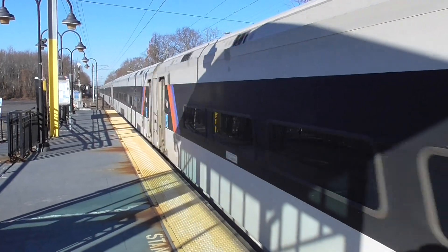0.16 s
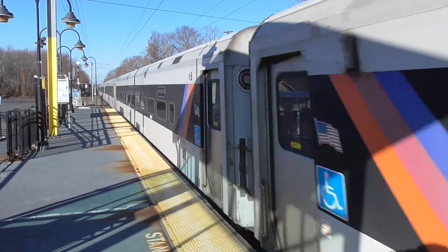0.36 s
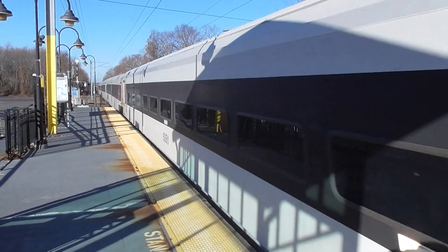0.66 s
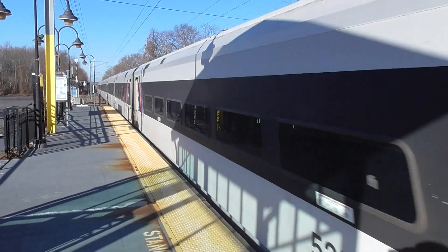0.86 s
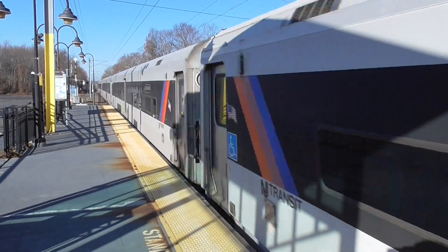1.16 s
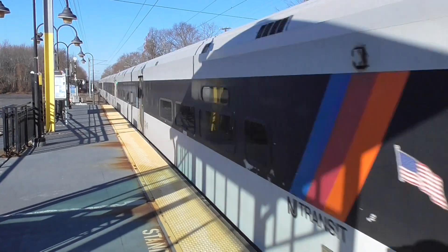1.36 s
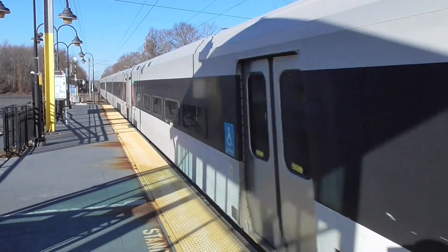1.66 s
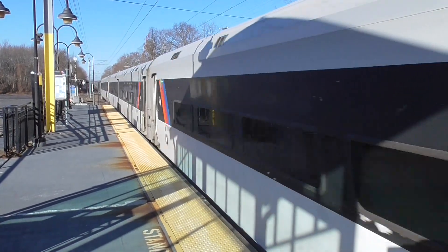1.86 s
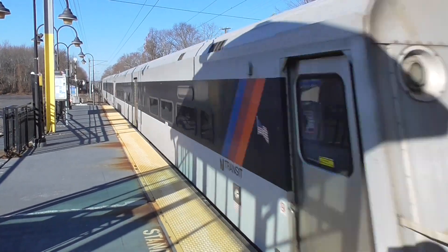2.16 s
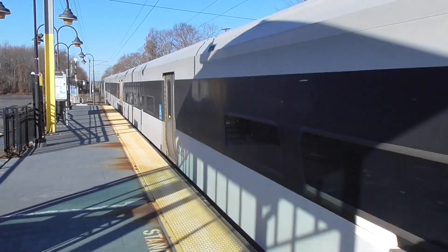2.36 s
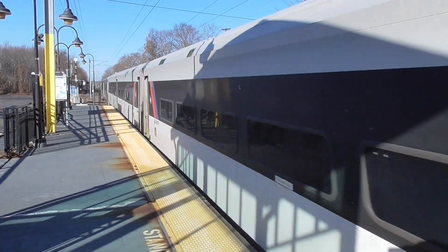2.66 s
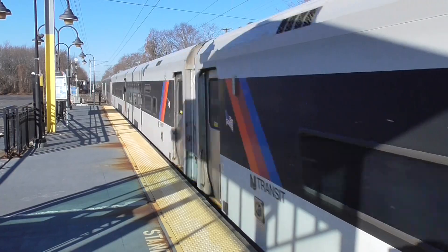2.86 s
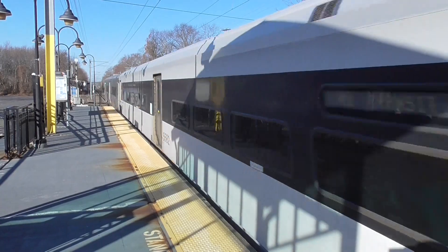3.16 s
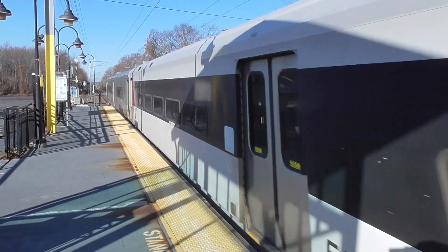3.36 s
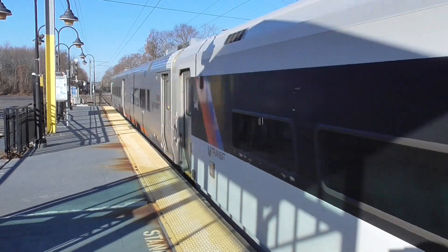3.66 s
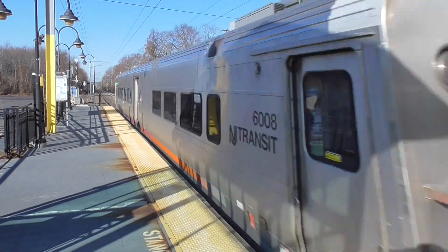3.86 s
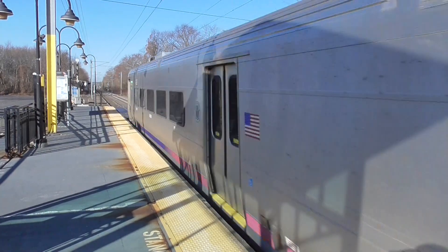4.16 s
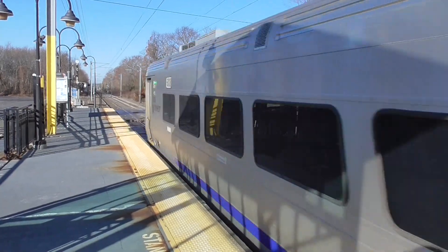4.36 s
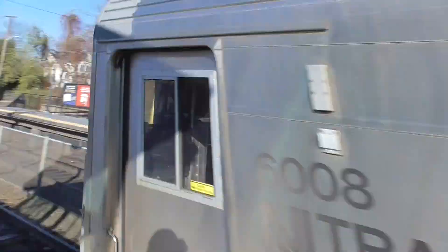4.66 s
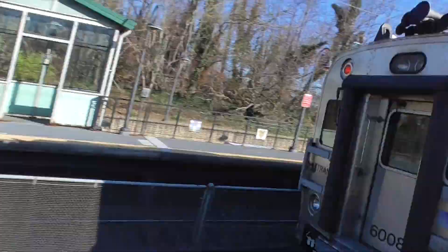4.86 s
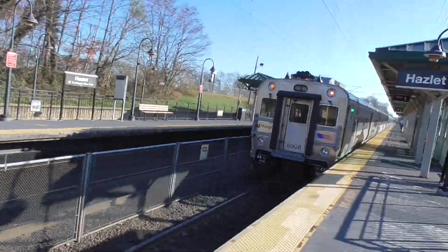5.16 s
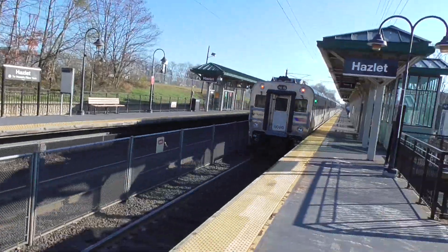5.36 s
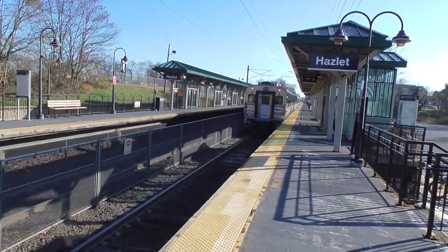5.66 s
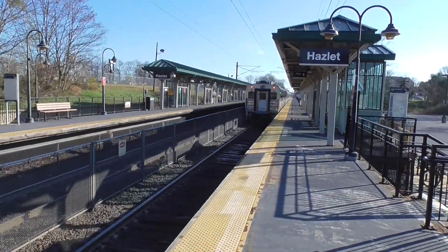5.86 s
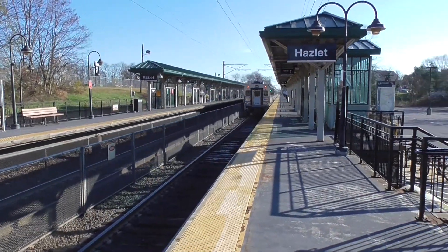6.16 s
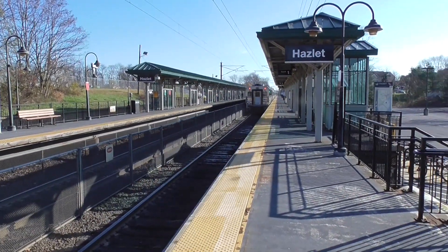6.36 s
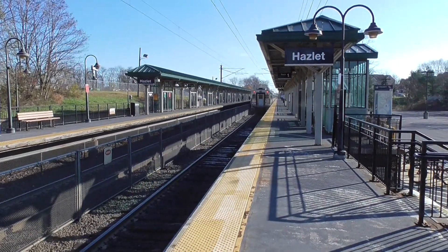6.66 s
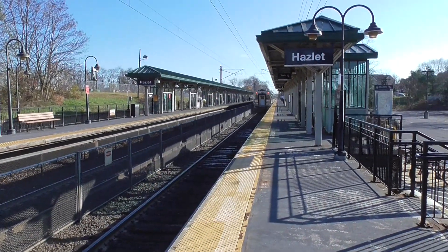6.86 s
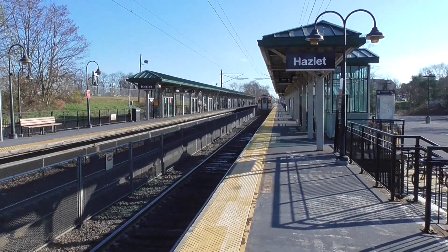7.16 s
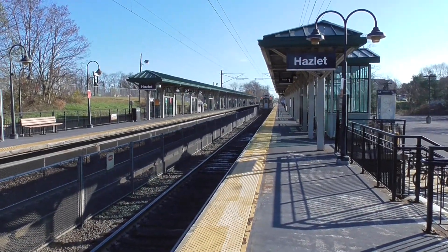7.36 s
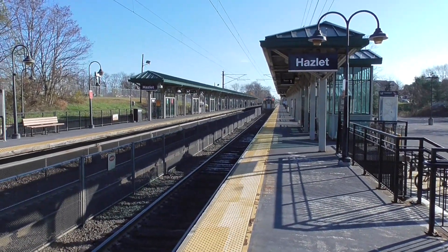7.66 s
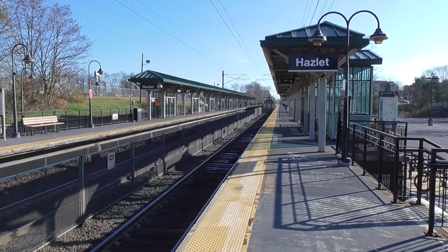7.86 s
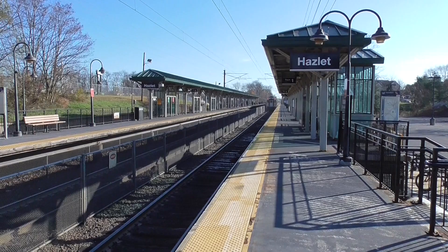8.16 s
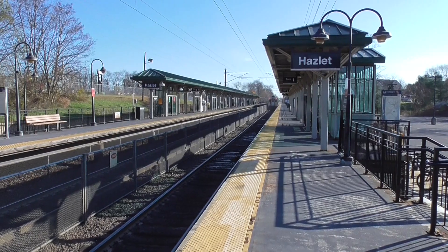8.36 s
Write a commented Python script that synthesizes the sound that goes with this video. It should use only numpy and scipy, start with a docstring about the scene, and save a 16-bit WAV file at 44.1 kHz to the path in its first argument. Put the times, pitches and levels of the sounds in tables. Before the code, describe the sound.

A dense mid-low roar of steel wheels with bogie swells and a fast throb passes very near, a muffled horn chord droning ahead. Loose gear clatters most around four seconds. Then the tail passes, leaving thin treble rail sizzle and unsteady ringing notes. The train recedes outdoors while heavy wind thumps and tiny grit ticks strike the microphone, the sound becoming almost mono.

```python
"""From the platform edge: an electric train rushes along and recedes, its horn chord humming dully from far ahead.
Rough wheels roar on the rails, each bogie swells with hiss, and puffs of air reach the microphone.
Loose gear clacks under the cars, thuds punctuate the roar and a wheel flange squeaks.
Behind the last car the rails sizzle and sing in narrow treble bands and a few unsteady notes;
then lumpy wake gusts buffet the microphone, deep bass pulls the gain down, and blown grit ticks."""
import sys
import numpy as np
from scipy import signal
from scipy.fft import rfft, irfft, next_fast_len
from scipy.io import wavfile
from scipy.ndimage import uniform_filter1d, map_coordinates

SR = 44100
rng = np.random.default_rng(int(sys.argv[2]) if len(sys.argv) > 2 else 0)


def store_wav(level_fs):
    """Save 16-bit WAV to argv[1]."""
    pcm = np.round(np.clip(np.atleast_2d(level_fs), -1, 1) * 32767)
    wavfile.write(sys.argv[1], SR, pcm.T.astype(np.int16))


N = 375732
TIME = np.arange(N) / SR
AWAY_S = 6.88   # from here on the train fades into the distance


def from_db(db):
    """Decibels to gain."""
    return 10 ** (np.asarray(db) / 20)


def rms_one(x):
    """Scale to unit power."""
    return x / np.sqrt(np.mean(x ** 2) + 1e-20)


def in_time(rows):
    """Each column of a curve, read at every sample."""
    s, *columns = np.transpose(rows)
    return [np.interp(TIME, s, c) for c in columns]


def at_hz(points, hz):
    """Read a spectrum on a log-frequency axis."""
    f, value = np.transpose(points)
    return np.interp(np.log(hz + 1), np.log(f), value)


def since(s):
    """Seconds gone by since a moment; zero before it."""
    return np.maximum(TIME - s, 0)


def drift(rate_hz):
    """Slow random wandering with spread 1; a higher rate wanders faster."""
    points, points_per_s = 4096, 400
    f = np.fft.rfftfreq(points, 1 / points_per_s)
    slow = irfft(rfft(rng.standard_normal(points)) / (1 + (f / rate_hz) ** 2))
    return np.interp(TIME * points_per_s, np.arange(len(slow)), rms_one(slow))


def passing(times, levels_db, fall_db_per_s):
    """Envelope of sources that swell as they come near and fall as they leave; their powers add."""
    powers = [from_db(db - fall_db_per_s * np.abs(TIME - s)) ** 2 for s, db in zip(times, levels_db)]
    return np.sqrt(sum(powers))


def swells(rows):
    """Envelope of bell-shaped swells (time, level, half length to 4.3 dB down); their powers add."""
    powers = [from_db(db) ** 2 * np.exp(-np.minimum(((TIME - s) / half) ** 2, 50)) for s, db, half in rows]
    return np.sqrt(sum(powers))


def bursts(rows, rise_s):
    """Envelope of blows (time, level, t60) that rise quickly and die away, cut off after half a second."""
    out = np.zeros(N)
    for s, db, t60 in rows:
        start = int(s * SR)
        age = TIME[:N - start][:SR // 2]
        out[start:start + len(age)] += from_db(db - 60 * age / t60) * (1 - np.exp(-age / rise_s))
    return out


def noise(colour):
    """Coloured noise as the two microphone ports hear it, closed off beyond the ends of its spectrum; rms 1."""
    # likeness of the two ports: (frequency [Hz], left-right correlation)
    likeness = [(60, 0), (150, 1), (270, 0.84), (550, 0.81), (1500, 0.79), (3500, .5), (6300, 0.55),
                (7800, 0.38), (9300, -.25), (12000, -.12), (15000, 0)]
    # balance of the two ports: (frequency [Hz], left minus right [dB])
    balance = [(400, 0), (800, -1), (1400, -3), (4500, -2.5), (7800, 1), (10500, -2.7), (13000, -4)]
    size = next_fast_len(N, True)
    hz = np.fft.rfftfreq(size, 1 / SR)
    mid, side = rfft(rng.standard_normal((2, size)))
    alike = np.clip(at_hz(likeness, hz), -1, 1)
    sign = np.array([[1], [-1]])   # left, right
    pair = np.sqrt(1 + alike) * mid + sign * np.sqrt(1 - alike) * side
    top_end = 1 / (1 + (hz / (2 * colour[-1][0])) ** 4)
    low_end = 1 / (1 + (colour[0][0] / (2 * hz + 1)) ** 4)
    gain = from_db(at_hz(colour, hz) + sign * at_hz(balance, hz) / 2)
    return rms_one(irfft(pair * top_end * low_end * gain)[:, :N])


def patchy(x, depth_db, patch_hz, patch_s, swell=lambda hz: 0):
    """Paths from passing wheels keep shifting, so patches of the spectrum rise and fall; swell adds dB by pitch."""
    hz, s, z = signal.stft(x, SR, nperseg=1024)
    field = rng.standard_normal((800, 400))
    where = np.meshgrid(hz / patch_hz, s / patch_s, indexing="ij")
    patches_db = depth_db * map_coordinates(field, where, order=3, mode="wrap")
    gain = from_db(patches_db + swell(hz[:, None]))
    return rms_one(signal.istft(z * gain, SR)[1][:, :N])


def horn_envelope(attack_s=0.04, release_s=0.087, echo_db=-6.5, echo_s=0.68):
    """Each blast opens, holds and shuts, leaving a faint echo along the line."""
    # horn blasts: (start [s], end [s], level at the start [dB], level at the end [dB])
    blasts = [(-.06, 0.695, -16, -13.5), (0.767, 2.116, -12.5, -18), (3.103, 4.003, -27.5, -31),
              (5.02, 5.257, -25, -27.5), (5.546, 6.554, -23, -23.5), (6.996, 8.453, -19.5, -19.5)]
    out = np.zeros(N)
    for start, end, first_db, last_db in blasts:
        hold = from_db(np.interp(TIME, [start, end], [first_db, last_db]))
        opening = 1 - np.exp(-since(start) / attack_s)
        shutting = np.exp(-since(end) / release_s)
        echo = from_db(echo_db) * np.exp(-since(end) / echo_s)
        out = np.maximum(out, hold * opening * np.maximum(shutting, echo))
    return out


def horn(lowest_waver_db=0.23, upper_waver_db=1.0, level_db=-0.2):
    """Each bell holds one note; once the track lies open the notes near 350, 393 and 571 Hz grow louder while
    those at 338 and 473 Hz fade, and shifting reflections make them waver."""
    # horn bells and overtones: (frequency [Hz], level while cars pass [dB], level from down the open track [dB])
    bells = [(285.4, 0, 0), (338, -15, -22), (349.9, -8.7, -5.5), (393, -17.5, -13), (473, -22, -26),
             (570.6, -24, -11.5)]
    open_track = np.minimum(since(AWAY_S), 1)
    out = np.zeros(N)
    for k, (hz, shaded_db, open_db) in enumerate(bells):
        phase = 2 * np.pi * np.cumsum(hz + 0.4 * drift(4)) / SR
        waver = (upper_waver_db if k else lowest_waver_db) * drift(5)
        out += np.sin(phase) * from_db(shaded_db + open_track * (open_db - shaded_db) + waver)
    return np.sqrt(2) * out * horn_envelope() * from_db(level_db)


def roar_noise(focus_db=5.0, focus_octaves=0.38, patch_db=1.0):
    """Rough wheels shake the rails; the roar swells around a centre that moves as the bogies pass."""
    # centre of the roar: (time [s], frequency [Hz])
    roar_centre = [(0.0, 400), (1.35, 454), (1.9, 656), (2.63, 554), (3.65, 650), (4.0, 477), (4.5, 485),
                   (4.95, 650), (5.48, 750), (6.62, 644), (7.2, 685), (8.52, 600)]
    # roar spectrum: (frequency [Hz], relative level [dB])
    roar_colour = [(150, -29), (280, -2), (440, -1.5), (520, -2), (720, 0.5), (860, -0.5), (1000, -6.5),
                   (1250, -14), (1800, -33.5)]
    frames = np.arange(0, N + 512, 512) / SR   # one per spectral frame of patchy
    centre = np.interp(frames, *np.transpose(roar_centre))

    def swell(hz):
        octaves_away = np.log2((hz + 1) / centre)
        return focus_db * np.exp(-0.5 * (octaves_away / focus_octaves) ** 2)

    return patchy(noise(roar_colour), patch_db, patch_hz=69.0, patch_s=0.1, swell=swell)


def roar(roll_db, throb_db, level_db=2.0, fade_db_per_s=3.5):
    """The roar throbs with the wheels, broken by thuds on uneven rail, and fades down the track."""
    # dull thuds of wheels on uneven rail: (time [s], level [dB], t60 [s])
    thuds = [(.32, -17, 0.28), (2.188, -13, 0.046), (2.512, -12, 0.045), (2.805, -12, .04), (2.9, -16, .3),
             (3.128, -9, .04), (3.366, -13, .04), (3.83, -22, .45), (4.105, -14.5, 0.71),
             (4.225, -11, 0.055), (5.205, -12.5, 0.27), (5.719, -6, 0.029)]
    steady = from_db(roll_db + level_db + throb_db - fade_db_per_s * since(AWAY_S))
    return roar_noise() * np.hypot(steady, bursts(thuds, rise_s=0.001))


def wheel_ring(roll_db, throb_db, gone, bogies, far_swell, near_db=-16.0, far_db=-6.5, grain_db=0.7):
    """Wheels ring close by; behind the last car the far rails' own bands take over from the steady ring."""
    # near wheel spectrum: (frequency [Hz], relative level [dB])
    wheel_colour = [(700, -6), (1050, 1.5), (1550, 1), (1820, -9), (2250, -7.5), (2700, -26), (3200, -20),
                    (4100, -20.5), (5400, -33), (8000, -49)]
    # far rail spectrum: (frequency [Hz], relative level [dB])
    far_rail_colour = [(750, -2), (1070, 4), (1180, 0), (1480, 2), (1780, -14), (2050, -8.5), (2550, -20.5),
                       (3200, -19), (3650, -16), (4400, -21.5), (5300, -36), (8000, -54)]
    wheels = patchy(noise(wheel_colour), 1.7, patch_hz=110, patch_s=0.15)
    near = np.sqrt(1 - gone) * from_db(roll_db + near_db)
    far = np.sqrt(gone) * from_db(roll_db + far_db - 1.5 * since(AWAY_S))   # fades 1.5 dB/s
    ring = wheels * np.hypot(near, bogies) + noise(far_rail_colour) * np.hypot(far, far_swell)
    return ring * from_db(throb_db / 2 + grain_db * drift(23))


def contact_hiss(roll_db, gone, bogies, far_swell, near_db=-31.0, far_db=-26.0, swell_db=-21.0):
    """Wheel on rail hisses in the treble, swelling with each bogie and again faintly from afar."""
    # contact hiss spectrum: (frequency [Hz], relative level [dB])
    hiss_colour = [(1500, -42), (3000, 1), (4200, 4), (5000, 0), (5800, -2), (7000, 2.5), (8500, 0.5),
                   (10500, 0), (12500, -7), (15500, -21)]
    hiss = patchy(noise(hiss_colour), 1.4, patch_hz=330, patch_s=0.11)
    distance_db = (1 - gone) * near_db + gone * far_db
    steady = from_db(roll_db + distance_db - 5 * since(AWAY_S))   # fades 5 dB/s
    steady = np.hypot(steady, from_db(swell_db) * far_swell)
    return hiss * np.hypot(steady, bogies) * from_db(0.5 * drift(40))


def rumble(bogies, level_db=-29.5, fade_db_per_s=21):
    """Sleepers rumble below the rails, more strongly under each bogie."""
    # rumble spectrum: (frequency [Hz], relative level [dB])
    rumble_colour = [(20, -33), (50, -21), (100, -13.5), (160, -6), (230, 0), (320, -0.5), (450, 0),
                     (800, -33)]
    steady = from_db(level_db - fade_db_per_s * since(AWAY_S))
    return noise(rumble_colour) * np.hypot(steady, bogies) * from_db(drift(8.4))


def rolling(turn_hz=12.5, throb_db=0.7, tail_s=4.66, tail_clears_s=0.69):
    """Rails roar, wheels ring and contact hisses, with a throb once a wheel turn; sleepers rumble below."""
    # base loudness of the rolling wheels, before any fade: (time [s], level [dB])
    roll = [(0.0, -20), (0.18, -21.5), (0.36, -20.5), (0.4, -21.5), (1.52, -21.5), (1.96, -19), (3.78, -19),
            (3.8, -17), (4.44, -20.5), (6.5, -21)]
    # the train moves across the ports as the microphone turns: (time [s], left minus right [dB])
    pan_curve = [(0, 0.5), (4.2, 0), (4.8, -1), (5.5, 3), (6.7, 1)]
    # bogies passing: (time [s], contact hiss level [dB], wheel ring level [dB], rumble level [dB])
    bogies = [(0.59, -39.5, -31.5, -30), (1.42, -37.5, -29.5, -25), (2.05, -44, -33.5, -30),
              (2.3, -42, -29, -26), (3.16, -41.5, -35, -31.5), (3.82, -42.5, -28, -24),
              (4.74, -40.5, -34.5, -33), (4.93, -36, -28, -32)]
    # the far rails swell again for a moment: (time [s], level [dB], half length [s])
    far_swells = [(7.26, -29.5, 0.19), (7.55, -24.5, 0.11)]
    roll_db, = in_time(roll)
    pan, = in_time(pan_curve)
    times, hiss_peaks, ring_peaks, rumble_peaks = np.transpose(bogies)
    throb = throb_db * np.sin(2 * np.pi * np.cumsum(turn_hz + drift(2.5)) / SR)
    gone = np.clip(since(tail_s) / tail_clears_s, 0, 1)   # the last car goes by and uncovers the track
    far_swell = swells(far_swells)
    out = roar(roll_db, throb)
    out += wheel_ring(roll_db, throb, gone, passing(times, ring_peaks, 25.5), far_swell)
    out += contact_hiss(roll_db, gone, passing(times, hiss_peaks, 26), far_swell)
    panned = out * from_db(np.array([pan, -pan]) / 2)
    return panned + rumble(passing(times, rumble_peaks, 15))


def draught(across_db=0.0, common_db=-14.0, steady_db=-61.0, lump_db=0.5):
    """Air crossing the microphone mostly pushes one port while it pulls the other."""
    # puffs of air dragged along by the cars: (time [s], level [dB], half length [s])
    puffs = [(.12, -40, 0.04), (1.15, -34, .025), (2.2, -36, 0.065), (2.51, -35, .03), (2.72, -34, .05),
             (3.8, -32, .05), (4.17, -29, 0.036), (4.32, -30, .03), (4.56, -28.5, 0.093),
             (5.04, -14.5, 0.033), (5.22, -25.5, 0.1), (5.92, -28, 0.14), (6.33, -18, 0.095),
             (6.6, -4.5, 0.024), (6.74, -12, 0.15)]
    colour = [(20, -17), (60, -4.5), (140, 7.5), (210, -3), (320, -6.5), (700, -29)]
    across = from_db(across_db) * noise(colour)[0] * np.array([[1], [-1]])
    common = from_db(common_db) * noise(colour)[0]
    level = np.hypot(swells(puffs), from_db(steady_db))
    return (across + common) * level * from_db(lump_db * drift(12))


def clacks(ring_db=-4.0, crack_db=-7, crack_t60=0.021):
    """Steel knocks on steel: a short crack, then a dense clatter under the car."""
    # clacks under the cars: (time [s], relative level [dB], t60 of the clatter [s])
    clack_rows = [(.565, -35, .2), (2.415, -31, .15), (2.491, -28.5, 0.17), (2.548, -39, .15),
                  (2.899, -28.5, .15), (3.17, -33, .2), (3.773, -31, 0.19), (3.858, -25, 0.38),
                  (3.981, -27.5, 0.41), (4.062, -34, 0.33), (4.141, -22, 0.061), (4.156, -31, 0.44),
                  (4.225, -36, 0.29)]
    # clack spectrum: (frequency [Hz], relative level [dB])
    clack_colour = [(700, 1), (1500, 9.5), (2700, -2.5), (4700, -0.5), (6000, -4), (8000, -3), (11000, -7),
                    (13000, -20), (16000, -18)]
    ring = from_db(ring_db) * bursts(clack_rows, rise_s=0.0016)
    crack_rows = [(s, db, crack_t60) for s, db, _ in clack_rows]
    crack = from_db(crack_db) * bursts(crack_rows, rise_s=0.0005)
    return noise(clack_colour) * (ring + crack)


def squeaks(scatter_hz=150.0):
    """A flange touches the rail and sings for an instant."""
    # brief wheel squeaks: (time [s], frequency [Hz], peak level [dB], half length to 4 dB down [s])
    squeak_rows = [(1.515, 14800, -47, .014), (5.6, 13600, -53, .02), (5.74, 13650, -52, .015)]
    wobble = scatter_hz * drift(150)
    out = np.zeros(N)
    for s, hz, db, length in squeak_rows:
        level = from_db(db - 4 * np.minimum(((TIME - s) / length) ** 2, 50))
        out += level * np.sin(2 * np.pi * np.cumsum(hz + wobble) / SR)
    return out


def rail_sizzle(level_db=-42.0, rise_db_per_s=19.0, fade_db_per_s=0.36, burst_s=4.94, burst_db=-39.0,
                burst_fall_db_per_s=53.0, flicker_db=1.6, near_s=4.8, far_s=7.3):
    """Wheel hiss runs back along the rails, flaring at the last bogie; far off, the least damped treble survives."""
    # far sizzle spectrum: (frequency [Hz], relative level [dB])
    sizzle_colour = [(6000, -30), (9300, -18), (9700, -5), (10050, -11), (10600, 2), (11300, -2),
                     (11800, 3), (12400, -6), (14000, -1), (15700, -8)]
    approach_db = rise_db_per_s * np.maximum(near_s - TIME, 0)
    steady = from_db(level_db - approach_db - fade_db_per_s * since(near_s))
    level = np.hypot(steady, passing([burst_s], [burst_db], burst_fall_db_per_s))
    far = np.clip(since(near_s) / max(far_s - near_s, 0.1), 0, 1)
    broad = noise([(6000, -15), (8500, -1), (11000, -0.5), (13000, -13), (15700, -17)])
    sizzle = np.sqrt(1 - far) * broad + np.sqrt(far) * noise(sizzle_colour)
    return sizzle * level * from_db(flicker_db * drift(15))


def singing_rails(peak_s=5.87, half_length_s=0.58, wander_hz=3.0, waver_db=4.0):
    """Once uncovered, the rails sing a few unsteady notes that swell and die."""
    # notes sung by the rails just behind the train: (frequency [Hz], level [dB])
    rail_notes = [(732, -42), (1061, -37.5), (1157, -40.5)]
    notes = np.zeros(N)
    for hz, db in rail_notes:
        phase = 2 * np.pi * np.cumsum(hz + wander_hz * drift(12.1)) / SR
        notes += from_db(db + waver_db * drift(12)) * np.sin(phase)
    return np.sqrt(2) * notes * swells([(peak_s, 0, half_length_s)])


def wake(level_db=0.0, between_db=-30.0, arrives_s=6.3, lump_db=2.3, thump_db=0.0, thump_t60=0.093):
    """Eddies behind the train strike the ports in lumpy gusts, the hardest as separate thumps."""
    # gusts of the wake on the microphone: (time [s], level [dB], half length [s])
    gust_rows = [(6.63, -18, .03), (6.76, -11.5, 0.034), (6.88, -13, 0.034), (7.04, -21, .025),
                 (7.14, -22.5, 0.029), (7.35, -16, 0.044), (7.44, -15.5, 0.047), (7.66, -13, 0.04),
                 (7.85, -19, 0.033), (7.98, -17.5, 0.059), (8.14, -19.5, 0.041), (8.28, -23, 0.064),
                 (8.43, -11.5, 0.079)]
    # single eddies that thump the ports: (time [s], level [dB])
    thump_rows = [(6.869, -1.5), (7.346, 1), (7.413, -9), (7.64, -24), (7.68, -17), (8.13, -5.5),
                  (8.422, -4)]
    # wake spectrum: (frequency [Hz], relative level [dB])
    wake_colour = [(20, -27), (45, -12.5), (75, -5), (120, -0.5), (210, -3.5), (300, -2), (450, -15),
                   (900, -35), (2500, -52)]
    between = from_db(between_db) * np.minimum(since(arrives_s), 1)
    gusts = np.hypot(swells(gust_rows), between) * from_db(level_db + lump_db * drift(28))
    thumps = from_db(thump_db) * bursts([(s, db, thump_t60) for s, db in thump_rows], rise_s=0.0023)
    return noise(wake_colour) * np.hypot(gusts, thumps)


def grit(level_db=0.5, t60=0.032):
    """Small bright ticks of blown debris."""
    # blown grit ticking on the platform: (time [s], relative level [dB])
    grit_rows = [(7.0002, -37.5), (7.3803, -40), (7.4472, -30), (7.8343, -40), (8.0972, -37), (8.1571, -50),
                 (8.2813, -42.5)]
    colour = [(5000, -25), (7000, -1), (10000, 0), (12000, -22)]
    ticks = bursts([(s, db, t60) for s, db in grit_rows], rise_s=0.001)
    return noise(colour) * from_db(level_db) * ticks


def gain_control(x, bass_hz=161.0, sense_s=0.02, above_db=-25, share=0.42, recover_db_per_s=8):
    """Deep bass, such as wind, turns everything down by a share of its excess; the gain then creeps back."""
    low_pass = signal.butter(4, bass_hz, fs=SR, output="sos")
    bass = signal.sosfilt(low_pass, x.mean(axis=0))
    power = uniform_filter1d(bass ** 2, int(sense_s * SR))
    bass_db = 10 * np.log10(np.abs(power) + 1e-12)
    cut = share * np.maximum(bass_db - above_db, 0)
    recovery = recover_db_per_s * TIME
    held = np.maximum.accumulate(cut + recovery) - recovery   # instant cut, steady recovery
    return x * from_db(-held)


def scene():
    """All sources at the platform edge."""
    train = horn() + rolling() + draught() + clacks() + squeaks()
    return train + rail_sizzle() + singing_rails() + wake() + grit()


def record(dry):
    """The stereo width closes, deep bass pushes the gain down, and the top is cut."""
    # the image narrows almost to mono in the wake: (time [s], width as a factor on the side signal)
    width_curve = [(0, 1.4), (4.8, 1.02), (5.3, 0.76), (6.72, 0.52), (6.86, 0.02), (7.35, 0.12),
                   (7.45, 0.0042)]
    cutoff_hz = 15750
    width, = in_time(width_curve)
    mid = (dry[0] + dry[1]) / 2
    side = width * (dry[0] - dry[1]) / 2
    levelled = gain_control(np.array([mid + side, mid - side]))
    return signal.sosfilt(signal.ellip(12, 0.1, 90, cutoff_hz, fs=SR, output="sos"), levelled)


dry = scene()
out = record(dry)
store_wav(out)
```